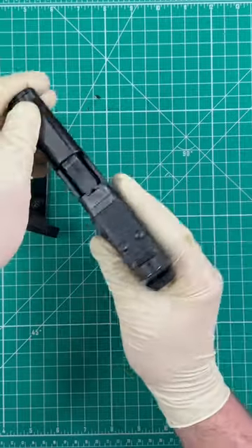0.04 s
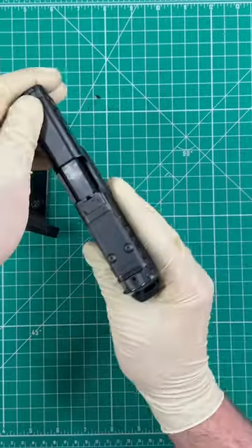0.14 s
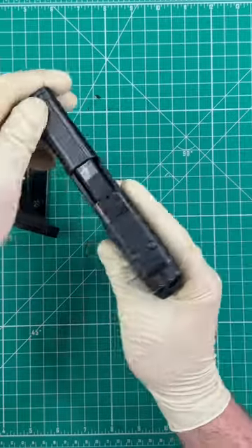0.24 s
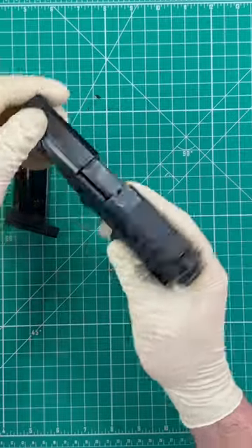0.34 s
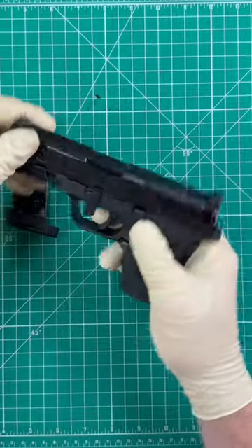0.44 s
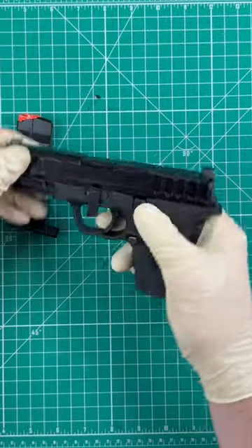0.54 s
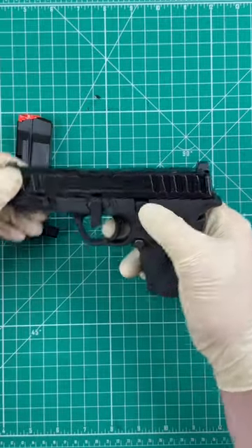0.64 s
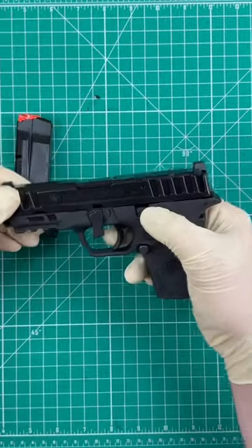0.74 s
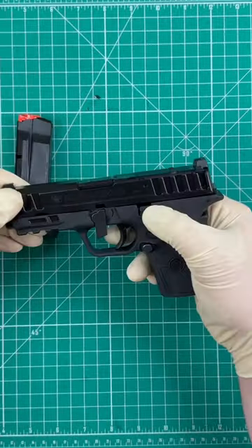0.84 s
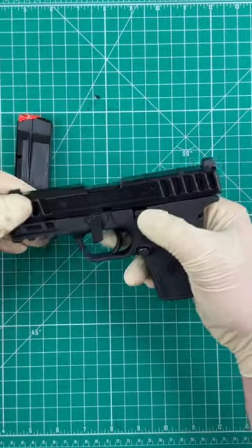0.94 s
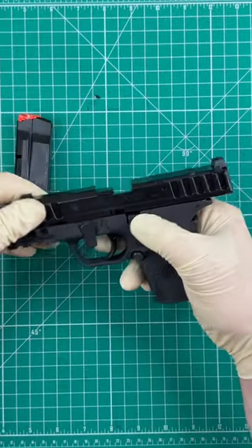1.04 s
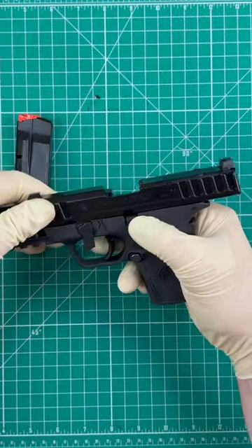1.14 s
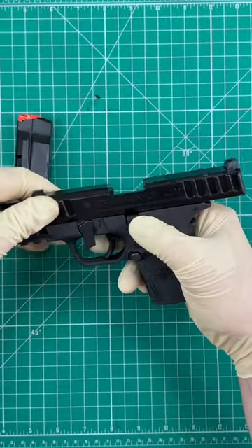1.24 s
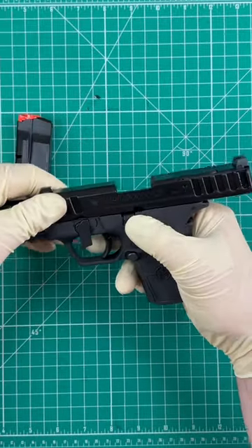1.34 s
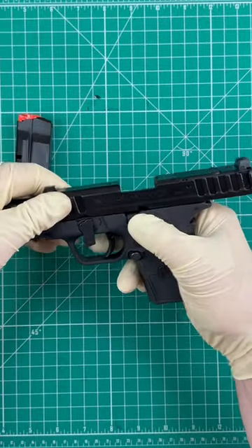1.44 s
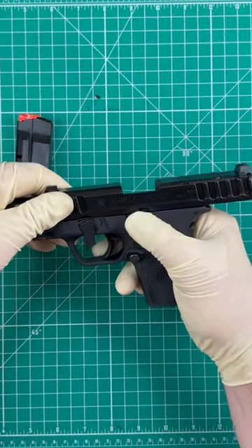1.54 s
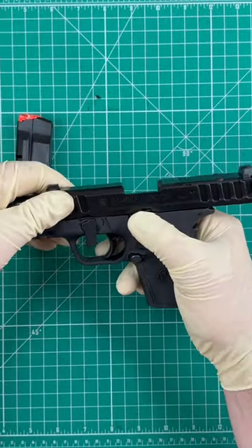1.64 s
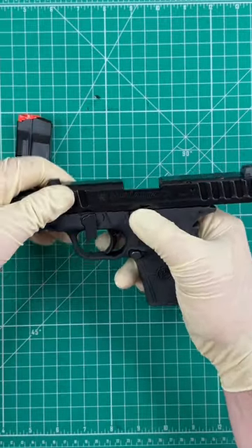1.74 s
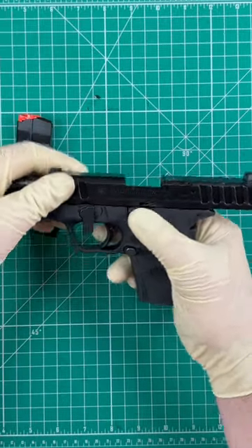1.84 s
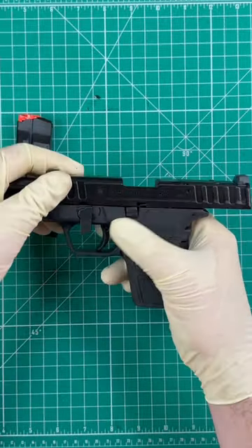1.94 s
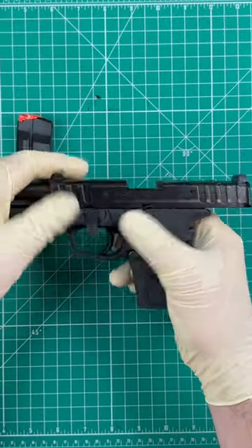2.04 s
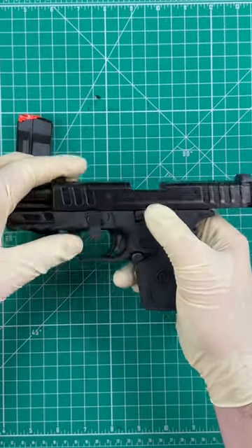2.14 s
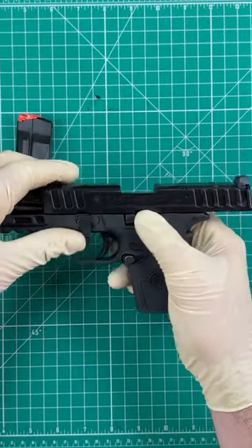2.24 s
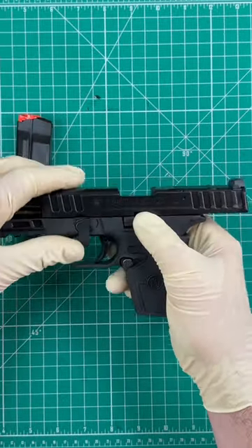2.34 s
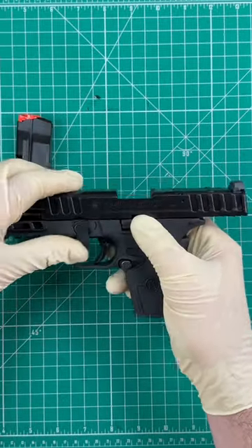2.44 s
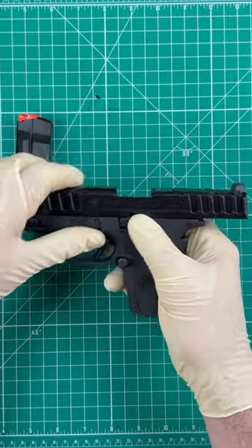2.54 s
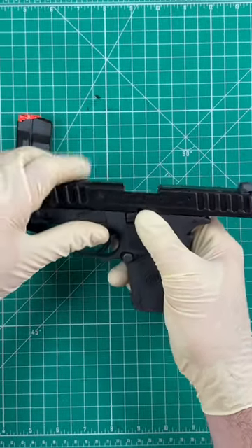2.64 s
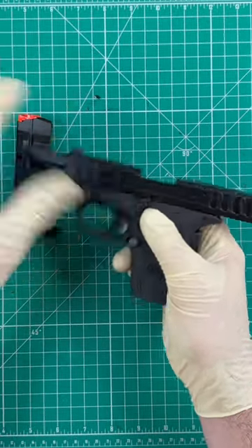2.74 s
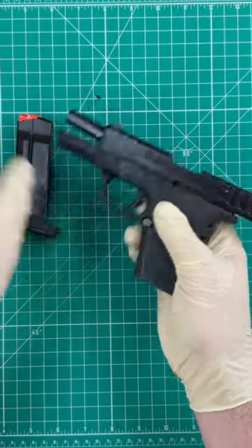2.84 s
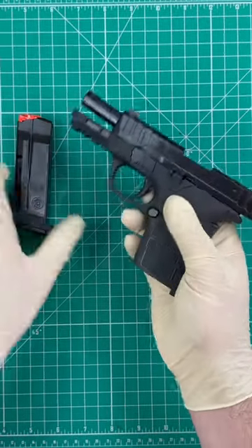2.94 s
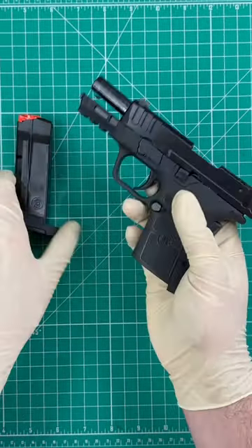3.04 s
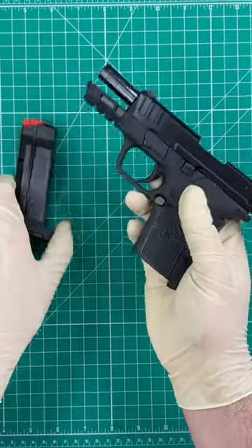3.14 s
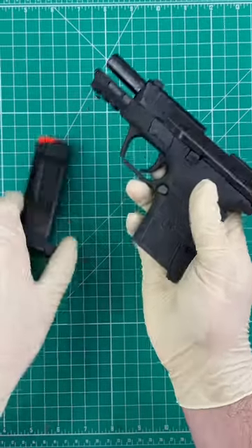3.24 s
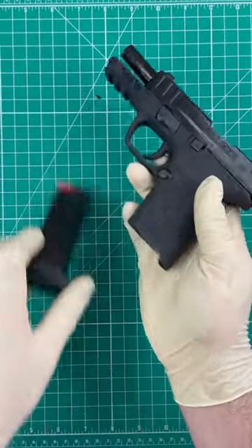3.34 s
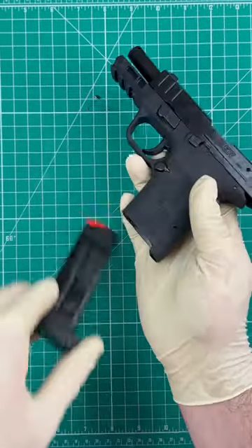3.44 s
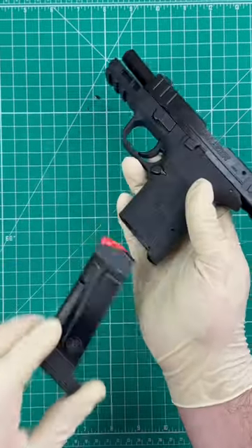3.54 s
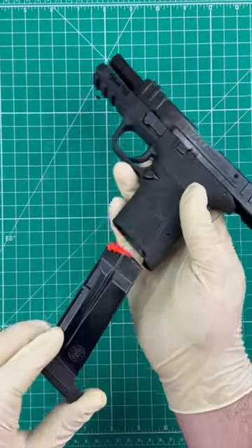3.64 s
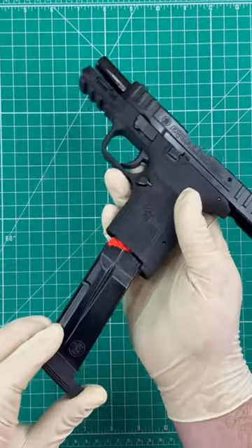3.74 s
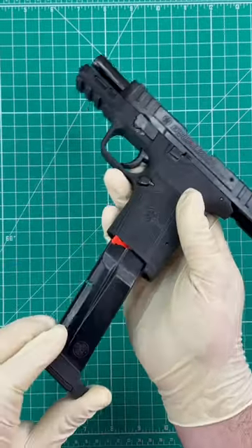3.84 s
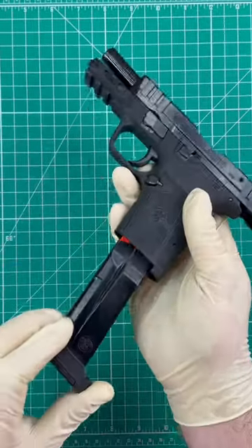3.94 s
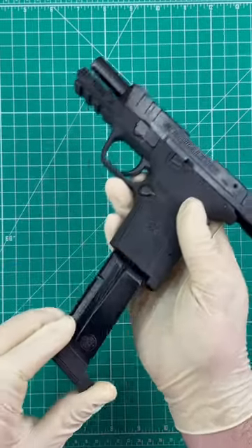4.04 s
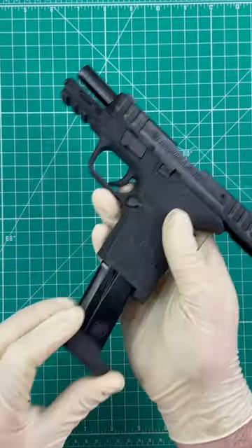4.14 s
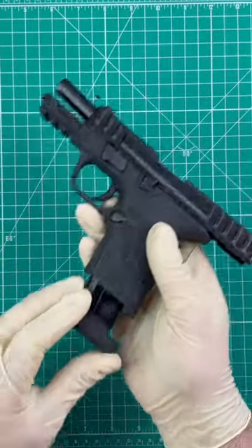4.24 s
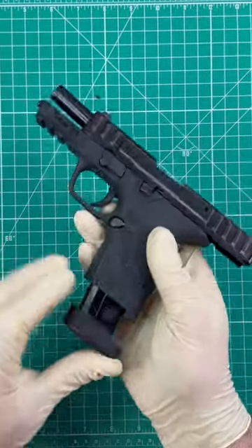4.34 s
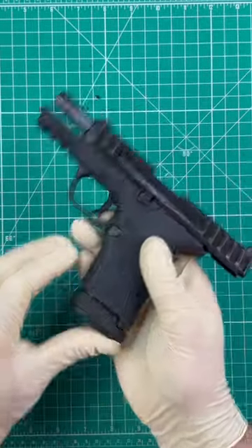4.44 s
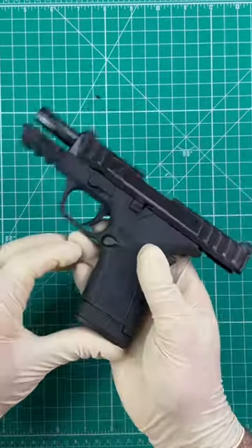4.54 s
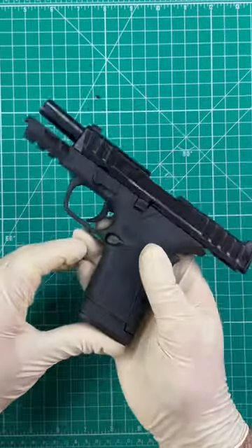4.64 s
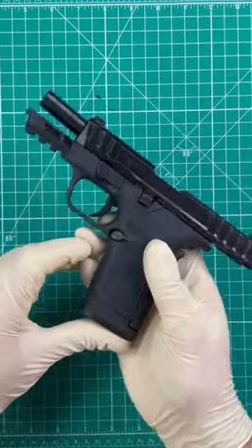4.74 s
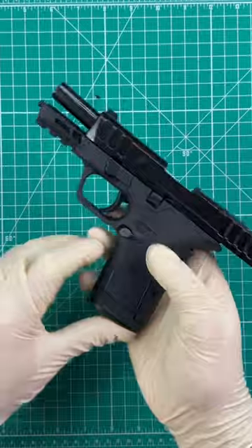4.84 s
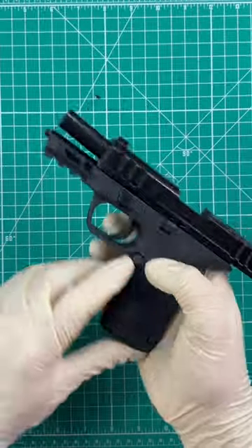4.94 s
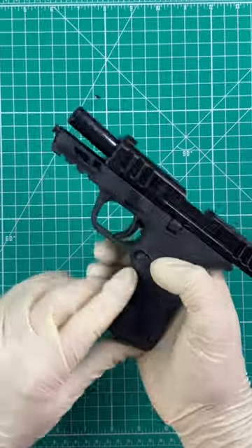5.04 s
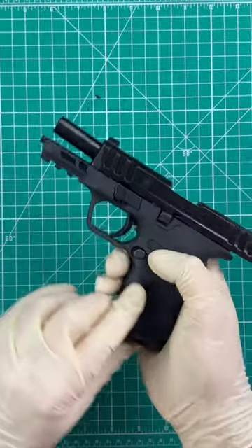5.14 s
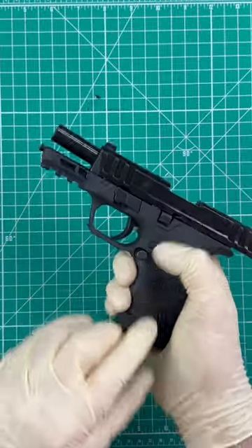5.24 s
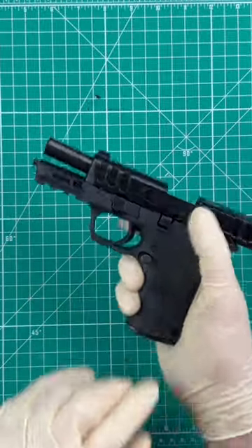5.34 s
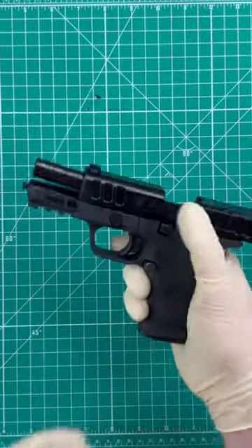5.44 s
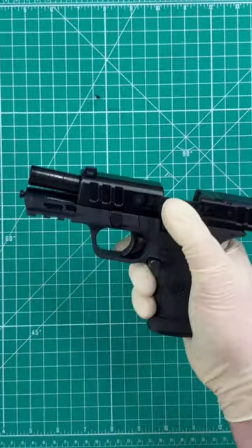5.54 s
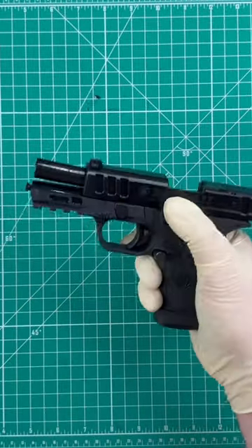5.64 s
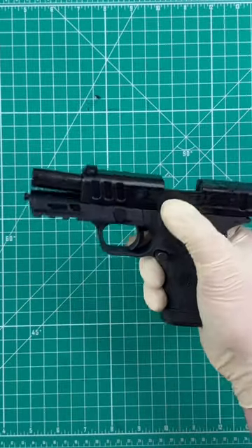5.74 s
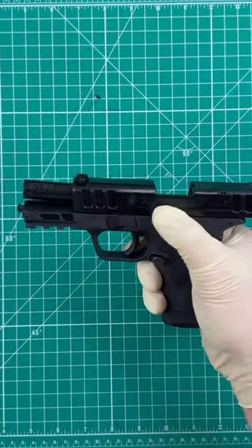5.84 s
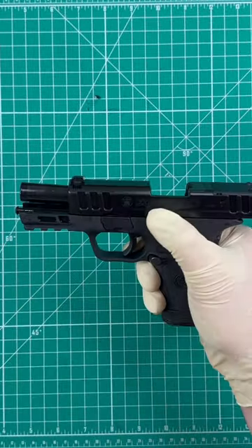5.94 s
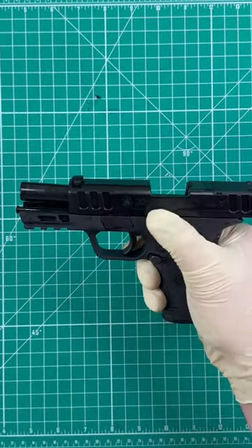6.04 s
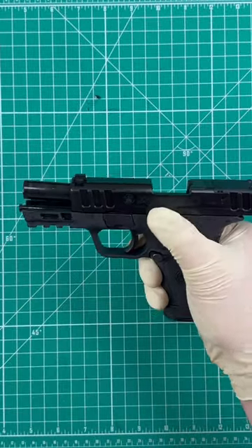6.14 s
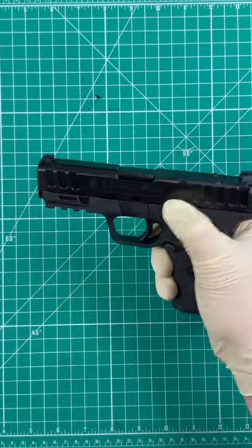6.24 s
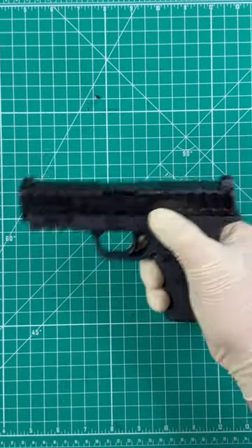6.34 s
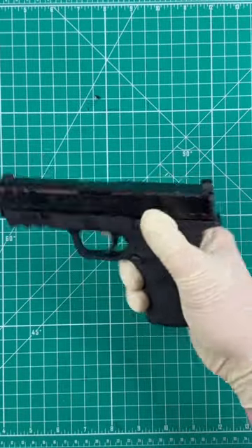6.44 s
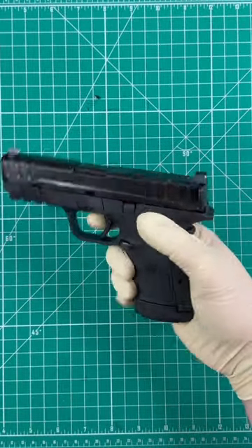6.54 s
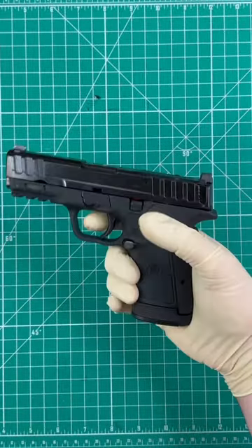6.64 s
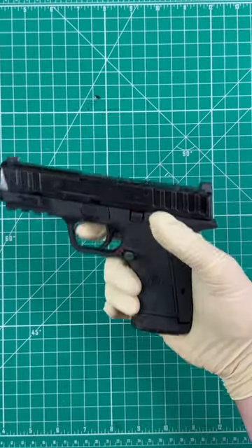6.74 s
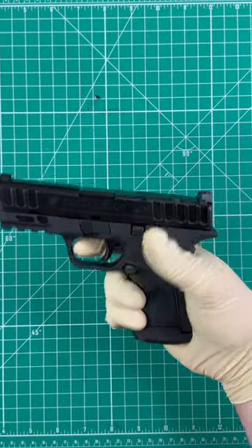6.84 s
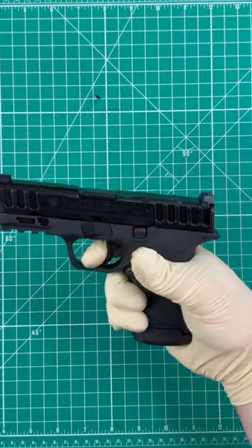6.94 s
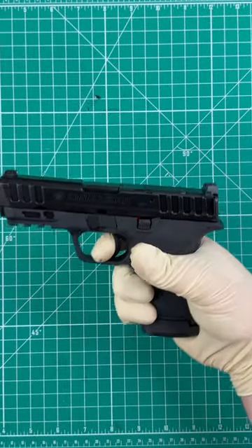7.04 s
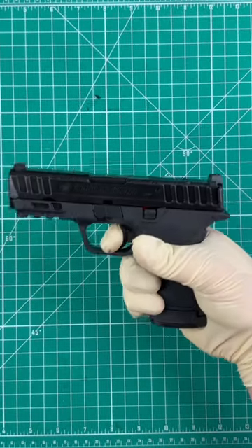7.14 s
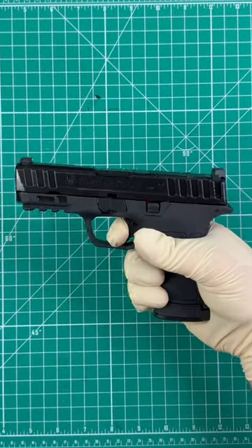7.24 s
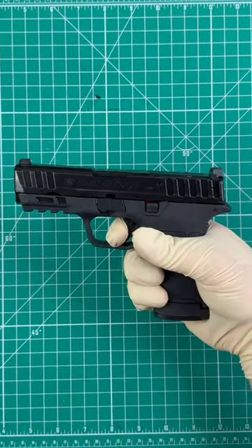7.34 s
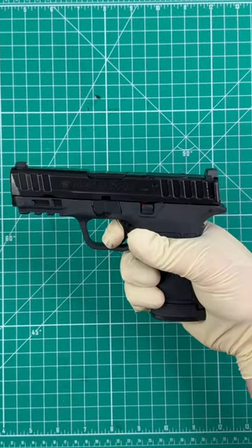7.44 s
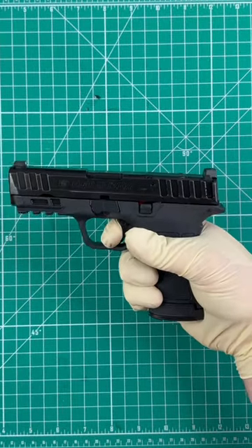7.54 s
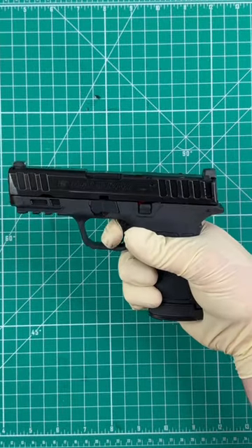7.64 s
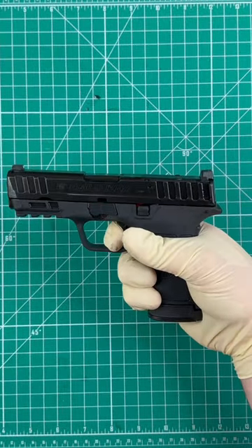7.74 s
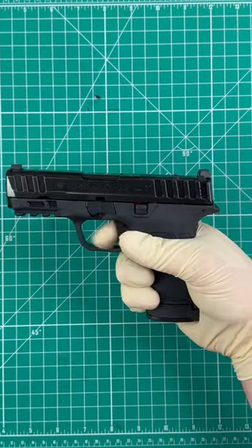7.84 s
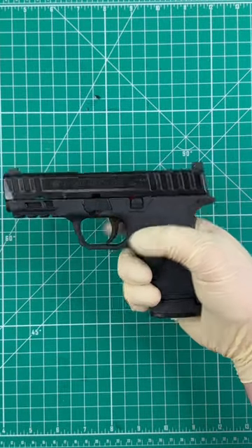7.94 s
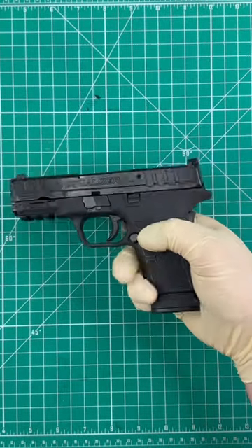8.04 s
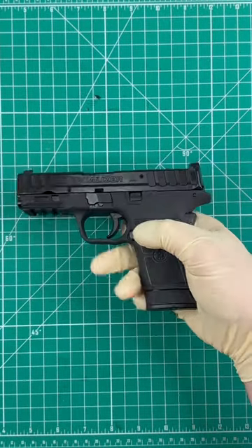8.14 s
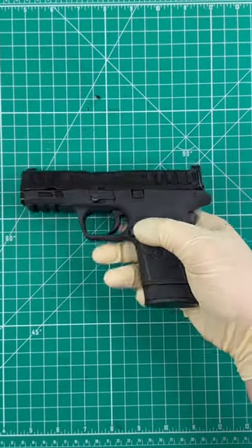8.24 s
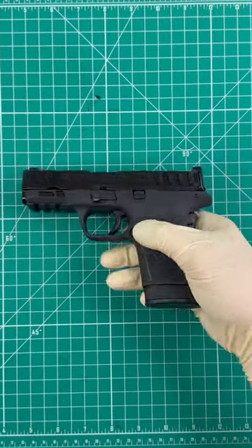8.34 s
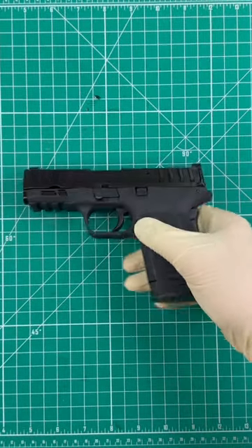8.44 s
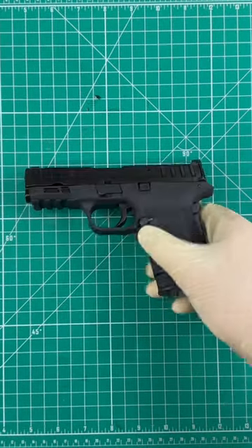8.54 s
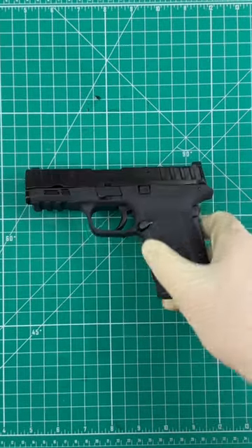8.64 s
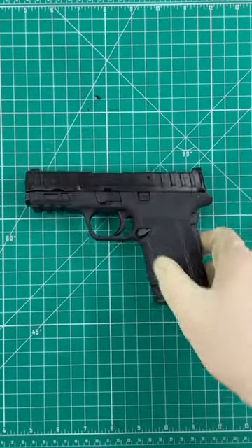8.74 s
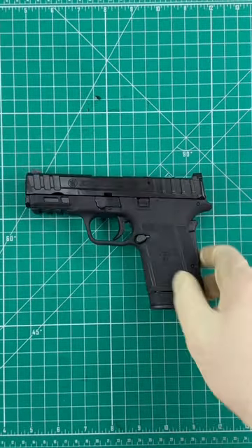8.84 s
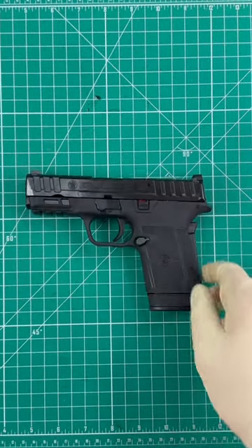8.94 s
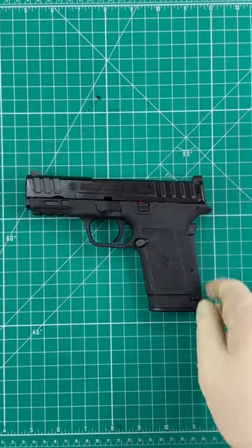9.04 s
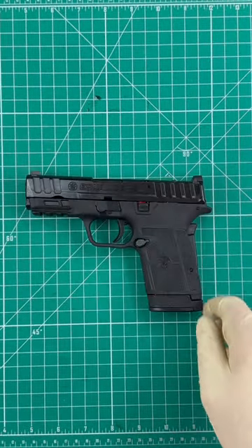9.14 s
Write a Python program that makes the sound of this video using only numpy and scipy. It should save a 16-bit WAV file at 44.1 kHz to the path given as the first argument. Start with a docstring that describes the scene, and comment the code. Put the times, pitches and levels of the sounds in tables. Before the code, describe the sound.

Close and nearly centred in a small, bright-sounding room: quiet rubbing of gloves and loose ticks, steel clicks on steel, a sharp lock, a short judder over a mat, plastic catches and a firm latch. Then comes the loudest event, a slamming slide with a puff of air, boom and spring rattle, followed by a crisp trigger click and soft bumps on the bench. A low fan hum runs underneath.

```python
"""A faint ventilation hum and a rustle of gloves open the scene: a pistol is put back together over a mat.
Steel clicks as the slide goes onto the frame and locks back; the magazine scrapes in and latches.
The slide slams shut with a puff, a boom and a buzzing spring; the trigger clicks, the pistol is laid down.
Noise bursts through resonances make the clicks, grainy noise the rubbing, dying sines the free rings;
filtered noise and wavering tones make the ventilation, and a noise tail makes the small, live room."""
import sys
import numpy as np
from scipy import signal
from scipy.fft import rfft, irfft, next_fast_len
from scipy.io import wavfile
from scipy.ndimage import uniform_filter1d

SR = 44100
rng = np.random.default_rng(int(sys.argv[2]) if len(sys.argv) > 2 else 0)


def bounce(signal):
    """Save signal as a 16-bit WAV file at the path given by the first command-line argument."""
    frames = np.transpose(np.atleast_2d(signal))
    limited = np.clip(frames, -1, 1)
    pcm = np.round(limited * 32767).astype(np.int16)
    wavfile.write(sys.argv[1], SR, pcm)


N = 405272

# ventilation noise: pitch_hz, level_db (per Hz, relative)
AIR_SPECTRUM = [(25, -11.5), (45, 0), (100, -3), (165, -10.5), (230, -6.5), (330, -13), (470, -15),
                (700, -19), (1200, -21.5), (2000, -28), (3600, -32), (4800, -42), (9000, -44),
                (15000, -50.5)]
# fan and mains tones: pitch_hz, level_db (before the common trim)
HUM_TONES = [(60, -63), (94, -59), (120, -55.5), (146, -70), (221, -64.5), (236, -63.5), (310, -68.5)]
# heard level of the background over time, turned down for a while along with its rumble: start_s, level_db,
# rumble_gain_db
BACKGROUND_LEVEL = [(0, 1, -4), (2.5, 2, -10), (2.8, 2, 1.5), (5.7, 0.5, -2.5), (6.6, 0, 6.5),
                    (6.9, 0, -32), (7.6, -6, -41.5), (8.12, -8, -30), (8.4, 1, -3.5), (9.19, 0, -2)]
# how busily the gloves work on the pistol: start_s, level_db (before the uneven pressure)
GLOVE_RUSTLE = [(0, -61), (0.3, -66.5), (0.6, -69), (1.5, -76), (1.75, -57.5), (2.4, -71.5), (3.0, -65),
                (3.65, -76.5), (4.7, -61), (5.2, -57.5), (5.8, -80), (6.75, -65), (7.1, -81.5),
                (8.1, -66.5), (8.5, -65), (9.19, -73)]
# parts slide along each other: start_s, end_s, level_db (before the uneven pressure)
SLIDING_STROKES = [(0.358, 0.452, -51.5), (0.871, 1.095, -52.5), (1.21, 1.287, -51), (2.483, 2.505, -46),
                   (3.725, 3.77, -43.5), (3.896, 4.061, -44.5), (4.07, 4.233, -46.5), (4.386, 4.45, -48.5),
                   (6.17, 6.194, -33), (7.629, 7.654, -48), (8.332, 8.47, -64.5)]
# bright colour of the rubbing: pitch_hz, level_db (per Hz, relative)
RUB_SPECTRUM = [(500, -21), (1000, -9.5), (1600, 1), (2700, -1), (4000, -8.5), (7000, -4), (9000, -8),
                (15000, -8)]
# resonances of the hand-held pistol: pitch_hz, width_hz, level_db
PISTOL_MODES = [(790, 550, 1), (1113, 140, -12), (1690, 91, -12), (2165, 1300, 0), (3425, 560, -4),
                (4300, 950, 2), (5320, 630, 0.5), (6140, 250, -13), (8500, 1500, 1.5), (9330, 800, -2.5)]
# decay of the room tail: pitch_hz, t60_s
ROOM_DECAY = [(100, 0.2), (800, 0.1), (2100, .42), (5500, 0.51), (9000, 0.46), (15000, 0.26)]
# strength of the room tail: pitch_hz, level_db
ROOM_STRENGTH = [(100, -12.5), (700, -6.5), (1600, -14), (3000, -13.5), (5000, -9), (9000, -8),
                 (15000, -9.5)]
# borders of the knock, body, steel and edge registers: pitch_hz
REGISTER_BORDERS = [450, 1250, 3300, 7000, 17000]
# steel clicks on steel: start_s, pitch_hz (of the part), level_db,
# hardness_db (edge over body), knock_db (low knock over body)
STEEL_CLICKS = [(0.4057, 2430, -51.5, -6, -13), (0.8976, 1810, -30, -13.5, -19),
                (0.9145, 1730, -35, -7, -13), (1.2556, 1844, -33.5, 7, -5.5),
                (1.2738, 1720, -17.5, -18, -22), (1.285, 1700, -37, -19.5, -4),
                (1.444, 1800, -45, 1.5, -56), (1.6354, 1510, -54, -3.5, -19),
                (1.7603, 1930, -51.5, -45, -7), (2.342, 1920, -54.5, -42, -6),
                (2.498, 2380, -19.5, -1.5, -38), (4.222, 2580, -21, -3, -23.5),
                (4.4277, 3020, -41.5, 13.5, -5), (4.4523, 2456, -15.5, -10, -23),
                (4.4655, 2450, -34.5, -24, -25), (4.795, 2610, -41.5, -10.5, -9),
                (6.175, 3120, -25.5, 11.5, -5), (6.1978, 2136, -19.5, 4.5, -11.5),
                (6.411, 1900, -49.5, -18, -13.5), (6.446, 2000, -43.5, -21, -21),
                (6.9426, 2245, -58, -21.5, -7.5), (7.6457, 1980, -31.5, -12.5, -19),
                (7.649, 2380, -22, 7, -28), (7.8358, 2330, -39, -19, -43), (8.0139, 2360, -68.5, 18.5, 4.5),
                (8.3512, 2010, -48, -7, 0), (8.4325, 2300, -73, 35.5, -12)]
# the magazine catches on the plastic walls of the grip: start_s, level_db
MAGAZINE_CATCHES = [(3.7307, -39.5), (3.7535, -43), (3.8875, -48), (3.9036, -37.5), (3.9296, -28),
                    (3.9339, -25), (4.0736, -37.5), (4.0996, -35.5), (4.1205, -33.5), (4.1312, -37),
                    (4.148, -35.5), (4.1797, -33.5), (4.4187, -32.5)]
# slide, barrel and springs ring on after a blow: pitch_hz, width_hz, level_db
STEEL_MODES = [(1518, 19, 4.5), (1752, 16, -1.5), (1792, 24, 2), (2094, 20, 3.5), (2442, 21, 3),
               (2650, 5.5, 4), (2934, 28, 1.5), (3120, 18, 0.5), (3230, 30, -2), (4440, 9.1, 11),
               (4960, 31, 1.5), (7600, 16, 5.5), (8112, 17, 5), (8200, 6.6, 4), (8600, 29, 5)]
# the hardest blows leave close modes clanging: start_s, pitch_hz (centre), level_db
CLANG_BLOWS = [(2.5, 1590, -36), (4.454, 2483, -28), (7.65, 2140, -33)]
# magazine nudged, then pistol laid down: start_s, level_db, bass_weight_db
MAT_BUMPS = [(3.144, -41.5, -20), (8.185, -32.5, -3), (8.469, -27.5, 2.5), (8.93, -44.5, -5),
             (8.973, -30, -1.5)]
# the bench under the mat: pitch_hz, level_db, t60_s
BENCH_MODES = [(67.7, 6, 0.17), (90.8, -3, 0.25), (126.5, 5, 0.17), (148, 2, 0.12), (194, 4.5, 0.101),
               (283, -1.5, 0.066), (338, 6, 0.059), (490, 0, 0.033), (605, -1.5, 0.052), (790, -6, 0.038)]
# the magazine knocks on the mouth of the grip: start_s, level_db
GRIP_MOUTH_KNOCKS = [(3.757, -48), (3.933, -42.5)]
# rings of the free magazine tube: pitch_hz, level_db, t60_s
MAGAZINE_MODES = [(1060, -7.5, 0.5), (1138, -13, 1), (1496, -8, 0.95), (1970, -8, .3), (2700, 5.5, 0.19),
                  (3020, -7, 1), (3630, -10.5, .35), (4380, -15, .4), (4850, -9, 0.14)]
# the hand jolted by the closing slide: pitch_hz, level_db, t60_s
HAND_JOLT = [(144, -14, 0.025), (255, -17, 0.045), (430, -17, 0.018)]
# buzz of the recoil spring: pitch_hz, level_db (per Hz, relative)
SPRING_SPECTRUM = [(500, -13.5), (1100, -15.5), (2100, 2), (3500, -5.5), (5500, -6), (8700, 4),
                   (12000, -11), (15000, -5)]
# left-right difference in room and air: pitch_hz, level_db
STEREO_WIDTH = [(60, -47), (250, -16.5), (500, -7), (1000, -4.5), (3000, -42), (6000, -27.5), (14000, -24)]
# tone of the microphone: pitch_hz, level_db
MIC_RESPONSE = [(20, -1.5), (9400, -0.5), (10300, -13), (11500, -15), (13500, -7.5), (15600, -7),
                (16200, -24.5)]
# phase by which the left port leads the right: pitch_hz, phase_rad
PORT_LEAD = [(150, 0), (300, -.12), (600, -.35), (1200, 0), (3000, .15), (4900, .25), (5400, -.5),
             (6500, -.9), (9500, -2.2), (11800, -3.1), (13800, -3.6), (16000, -4.7)]

SLAM_S = 6.199
DRAG_START_S, DRAG_END_S = 3.14, 3.287   # the magazine is pulled off the mat
# share of the hardness that reaches the steel register, and that register's offset
STEEL_SHARE, STEEL_OFFSET_DB = .45, -1.5
CUTOFF_HZ = 16600


def from_db(db):
    """Turns decibels into an amplitude factor."""
    return 10 ** (np.asarray(db) / 20)


def rms_one(x):
    """Brings a sound to an RMS level of 1."""
    return x / np.sqrt(np.mean(x ** 2) + 1e-20)


def at_hz(points, hz):
    """Reads a table on a log-frequency axis."""
    known, values = np.transpose(points)
    return np.interp(np.log(np.maximum(hz, 1)), np.log(known), values)


def add(out, s, sound):
    """Mixes a sound in at a time."""
    i = max(round(s * SR), 0)
    out[i:i + len(sound)] += sound[:max(N - i, 0)]


def band(x, hz, kind="band", order=2):
    """Keeps one frequency range with a Butterworth filter."""
    return signal.sosfilt(signal.butter(order, hz, kind, fs=SR, output="sos"), x)


def colour(x, spectrum):
    """Applies a smooth dB curve over frequency."""
    size = next_fast_len(N)
    gain = from_db(at_hz(spectrum, np.fft.rfftfreq(size, 1 / SR)))
    return irfft(rfft(x, size) * gain, size)[:N]


def resonate(x, hz, width_hz):
    """A two-pole resonance with gain 1 at its peak; a narrower one rings longer."""
    r = np.exp(-np.pi * width_hz / SR)
    numerator = np.array([1, 0, -1]) * (1 - r * r) / 2
    return signal.lfilter(numerator, [1, -2 * r * np.cos(2 * np.pi * hz / SR), r * r], x)


def resonate_twice(x, hz, stage_width_hz):
    """Two equal resonances in a row, for steeper sides."""
    return resonate(resonate(x, hz, stage_width_hz), hz, stage_width_hz)


def ring(hz, t60):
    """One second of a dying sine."""
    t = np.arange(SR) / SR
    return np.sin(2 * np.pi * hz * t) * np.exp(-np.log(1000) * t / t60)


def drift(per_s):
    """Slow chance: straight lines between normal random knots, so many per second."""
    knots = rng.standard_normal(4096)
    return np.interp(np.arange(N) / SR * per_s, np.arange(len(knots)), knots)


def ventilation(air_db=-54, rumble_hz=80, bass_hz=135, bass_share=.17, waver=0.17, hum_db=-1):
    """Moving air with wavering fan and mains tones; the bass partly follows the rumble."""
    t = np.arange(N) / SR
    s, *columns = np.transpose(BACKGROUND_LEVEL)
    level_db, rumble_db = [np.interp(t, s, column) for column in columns]
    sound = from_db(air_db) * rms_one(colour(rng.standard_normal(N), AIR_SPECTRUM))
    for hz, db in HUM_TONES:
        # the complex factor wavers both loudness and phase
        wavering = 1 + waver * (drift(2.9) + 1j * drift(5.9))
        sound += from_db(db + hum_db) * np.real(wavering * np.exp(2j * np.pi * hz * t))
    bass = from_db(bass_share * rumble_db) * band(sound, bass_hz, "low", order=5)
    sound = band(sound, bass_hz, "high", order=5) + bass
    rumble = from_db(rumble_db) * band(sound, rumble_hz, "low", order=7)
    return from_db(level_db) * (band(sound, rumble_hz, "high", order=7) + rumble)


def friction(grains_per_s, grain_db, smooth_db):
    """Tiny slips of random strength and sign over a smooth hiss."""
    happens = rng.random(N) < grains_per_s / SR
    strength = from_db(grain_db * np.minimum(rng.exponential(1, N), 4))
    slips = happens * strength * rng.choice([-1, 1], N)
    return rms_one(slips) + from_db(smooth_db) * rng.standard_normal(N)


def pistol_body(force, direct_db=-3):
    """Frame and slide ring briefly in broad resonances, damped by the hands."""
    modes = sum(from_db(db) * resonate(force, hz, width) for hz, width, db in PISTOL_MODES)
    return from_db(direct_db) * force + modes


def rubbing(uneven_db=5.5, ease_s=0.0093, part_dull_db=-17, glove_dull_db=-11,
            dull_low_hz=260, dull_high_hz=1350):
    """Parts and gloves rub under uneven pressure; soft gloves bring out more of the low mids."""
    parts = np.zeros(N)
    for start, end, db in SLIDING_STROKES:
        add(parts, start, np.full(round((end - start) * SR), from_db(db)))
    parts = uniform_filter1d(parts, int(ease_s * SR))   # soften the edges of each stroke
    gloves = from_db(np.interp(np.arange(N) / SR, *np.transpose(GLOVE_RUSTLE)))
    force = friction(grains_per_s=730, grain_db=4.5, smooth_db=3.5)
    bright = (parts + gloves) * rms_one(colour(pistol_body(force), RUB_SPECTRUM))
    dull_level = from_db(part_dull_db) * parts + from_db(glove_dull_db) * gloves
    dull = dull_level * rms_one(band(force, [dull_low_hz, dull_high_hz], order=3))
    pressure = from_db(uneven_db * drift(55))
    return pressure * (bright + dull)


def room(x, gap_s=0.0056, build_s=0.004, echo_s=.0112, echo_db=-19):
    """A dense noise tail with its own decay in each band, and one distinct reflection."""
    t = np.arange(SR * 3 // 4) / SR
    edges, response = np.geomspace(60, 17000, 15), np.zeros(len(t))
    for low, high in zip(edges, edges[1:]):
        hz = np.sqrt(low * high)
        decay = np.exp(-np.log(1000) * t / at_hz(ROOM_DECAY, hz))
        fade = np.clip((t - gap_s) / build_s, 0, 1) * decay
        tail = band(rng.standard_normal(len(t)), [low, high]) * fade / np.sqrt(np.sum(fade ** 2))
        response += from_db(at_hz(ROOM_STRENGTH, hz)) * tail
    response[round(echo_s * SR)] += from_db(echo_db)
    return signal.fftconvolve(x, response)[:N]


def chatter(rise_s, evenness=0.5):
    """A swelling and dying burst of hard micro-impacts that excites all frequencies fairly evenly."""
    age = np.arange(SR // 25) / SR / rise_s
    envelope = age * np.exp(1 - age)
    spectrum = rfft(rng.standard_normal(len(age)) * envelope)
    # partly flatten the random peaks and dips of the spectrum
    force = irfft(spectrum / np.abs(spectrum) ** evenness, len(age))
    return force * np.sqrt(envelope)


def contact(length_s, hz, db, hardness_db, knock_db, ring_db, swell=0.56, part_width_hz=520,
            broad_db=-11, ring_width_hz=60, reference_s=0.0078):
    """Milliseconds of chatter centred on the struck part, which sings on; hardness lifts the treble."""
    sound = pistol_body(chatter(swell * length_s))
    part = resonate(sound, hz, part_width_hz) + from_db(broad_db) * sound
    voices = [sound, part, sound, sound]   # knock, body, steel, edge
    levels = [knock_db, 0, STEEL_OFFSET_DB + STEEL_SHARE * hardness_db, hardness_db]
    click = np.zeros(SR // 5)
    for voice, edges, register_db in zip(voices, zip(REGISTER_BORDERS, REGISTER_BORDERS[1:]), levels):
        voice = band(voice, edges, order=4)
        even = voice * np.sqrt(reference_s * SR / np.sum(voice ** 2))   # the same energy in each register
        add(click, 0, from_db(db + register_db) * even)
    return click + from_db(ring_db) * resonate(click, hz, ring_width_hz)


def loose_ticks(count=24, length_s=.0035, tick_hz=1900, spread_octaves=.3, over_rustle_db=3,
                spread_db=8.0, hardness_db=-12, knock_db=-11, ring_db=-2):
    """Loose parts tick at random times; their strength varies around the level of the glove work."""
    out = np.zeros(N)
    for when, pitch, strength in rng.uniform(-1, 1, (count, 3)):
        s = (when + 1) / 2 * N / SR
        db = np.interp(s, *np.transpose(GLOVE_RUSTLE)) + over_rustle_db + spread_db * strength
        hz = tick_hz * 2 ** (spread_octaves * pitch)
        add(out, s, contact(length_s, hz, db, hardness_db, knock_db, ring_db))
    return out


def mechanism(click_s=0.0023, click_ring_db=-1.5, catch_s=.004, catch_hz=2287,
              catch_hardness_db=-15.5, catch_knock_db=-10.5, catch_ring_db=-3):
    """Slide, barrel, latches and trigger click; the magazine catches on its way up the grip."""
    out = np.zeros(N)
    for s, hz, db, hardness_db, knock_db in STEEL_CLICKS:
        add(out, s, contact(click_s, hz, db, hardness_db, knock_db, click_ring_db))
    for s, db in MAGAZINE_CATCHES:
        add(out, s, contact(catch_s, catch_hz, db, catch_hardness_db, catch_knock_db, catch_ring_db))
    return out


def steel_ring(force):
    """Narrow modes of the steel parts ring on, alternating in sign."""
    return sum((-1) ** k * from_db(db) * resonate(force, hz, width)
               for k, (hz, width, db) in enumerate(STEEL_MODES))


def clangs(stage_width_hz=260, t60=0.3):
    """Close modes, drawn as narrow noise, beat against each other as they die."""
    out, fade = np.zeros(N), from_db(-60 * np.arange(SR) / SR / t60)
    for s, hz, db in CLANG_BLOWS:
        modes = resonate_twice(rng.standard_normal(SR), hz, stage_width_hz)
        add(out, s, from_db(db) * fade * rms_one(modes))
    return out


def mat_drag(judder_hz=310, judder_stage_width_hz=220, judder_db=-43, judder_fall_db=-7,
             scuff_hz=1150, scuff_width_hz=550, scuff_db=-51, grit_low_hz=1800, grit_high_hz=4800,
             grit_start_db=-68.5, grit_rise_db=13, ease_s=0.0068):
    """The magazine judders over the mat; as it speeds up the judder fades and a gritty scrape grows."""
    progress = (np.arange(N) / SR - DRAG_START_S) / (DRAG_END_S - DRAG_START_S)
    touching = uniform_filter1d(1.0 * (progress > 0) * (progress < 1), int(ease_s * SR))
    speed = np.clip(progress, 0, 1)
    force = friction(grains_per_s=1200, grain_db=5, smooth_db=-1)
    judder = rms_one(resonate_twice(force, judder_hz, judder_stage_width_hz))
    judder *= from_db(judder_db + judder_fall_db * speed)
    scuff = from_db(scuff_db) * rms_one(resonate(force, scuff_hz, scuff_width_hz))
    grit = rms_one(band(force, [grit_low_hz, grit_high_hz]))
    grit *= from_db(grit_start_db + grit_rise_db * speed)
    return touching * (judder + scuff + grit)


def bench(bass_hz=110, build_cycles=0.59):
    """Bumps through the soft mat swell over about a cycle; weight sets how far the lowest modes speak."""
    out, t = np.zeros(N), np.arange(SR) / SR
    for k, (hz, mode_db, t60) in enumerate(BENCH_MODES):
        mode = (-1) ** k * ring(hz, t60) * (1 - np.exp(-t * hz / build_cycles))
        for s, db, weight_db in MAT_BUMPS:
            add(out, s, from_db(db + mode_db + weight_db * (hz < bass_hz)) * mode)
    return out


def frame_knocks(length_s=0.0021, frame_hz=1550, below_bump_db=-11, hardness_db=-16, knock_db=4, ring_db=-2):
    """Each bump on the mat also draws a dull knock from the plastic."""
    out = np.zeros(N)
    for s, db, _ in MAT_BUMPS:
        add(out, s, contact(length_s, frame_hz, db + below_bump_db, hardness_db, knock_db, ring_db))
    return out


def magazine(spread_db=2.4):
    """The free steel tube sings in dying sines when it knocks on the mouth of the grip."""
    out = np.zeros(N)
    for s, db in GRIP_MOUTH_KNOCKS:
        for hz, mode_db, t60 in MAGAZINE_MODES:
            add(out, s, from_db(db + mode_db + rng.normal(0, spread_db)) * ring(hz, t60))
    return out


def slam(puff_db=-10, puff_hz=66, peak_s=0.021, spread_s=0.0084,
         boom_db=-33, boom_hz=45, boom_t60=2.1, boom_end_s=0.49):
    """The closing slide jolts the hand and puffs air at the microphone; a deep boom lingers."""
    out, t = np.zeros(N), np.arange(SR) / SR - peak_s   # t runs from the peak of the puff
    puff = np.cos(2 * np.pi * puff_hz * t) * np.exp(-(t / spread_s) ** 2)
    add(out, SLAM_S, -from_db(puff_db) * puff)
    for k, (hz, db, t60) in enumerate(HAND_JOLT):
        add(out, SLAM_S, (-1) ** k * from_db(db) * ring(hz, t60))
    fade = np.interp(t, [boom_end_s / 2, boom_end_s], [1, 0])
    add(out, SLAM_S, from_db(boom_db) * ring(boom_hz, boom_t60) * fade)
    return out


def spring_buzz(db=-33, t60=0.8, attack_s=.008):
    """The coils of the recoil spring go on rattling after the slide has shut."""
    age = np.maximum(np.arange(N) / SR - SLAM_S, 0)
    envelope = np.minimum(age / attack_s, 1) * from_db(db - 60 * age / t60)
    rattle = friction(grains_per_s=1500, grain_db=4.0, smooth_db=-5.5)
    return envelope * rms_one(colour(rattle, SPRING_SPECTRUM))


def scene(steel_db=-4, ring_room_db=-4):
    """All direct sounds sit in the centre; only room and air have a little width."""
    handling = mechanism() + frame_knocks() + rubbing() + loose_ticks()
    singing = from_db(steel_db) * steel_ring(handling) + magazine()
    blows = handling + bench() + mat_drag()
    radiated = blows + from_db(ring_room_db) * singing   # what reaches the room
    mid = blows + singing + room(radiated) + slam() + spring_buzz() + clangs() + ventilation()
    side = colour(room(radiated) + ventilation(), STEREO_WIDTH)
    return np.array([mid + side, mid - side])


def record(dry):
    """Two microphone ports part in phase, mostly in the treble; peaks are rounded, the top is cut."""
    size = next_fast_len(N)
    phase = at_hz(PORT_LEAD, np.fft.rfftfreq(size, 1 / SR))
    toned = np.array([colour(channel, MIC_RESPONSE) for channel in dry])
    turn = np.exp(.5j * phase * [[1], [-1]])   # half the lead on each port
    ports = irfft(rfft(toned, size) * turn, size)[:, :N]
    top_cut = signal.ellip(10, .1, 80, CUTOFF_HZ, fs=SR, output="sos")
    return signal.sosfilt(top_cut, np.tanh(ports))


dry = scene()
out = record(dry)
bounce(out)
```